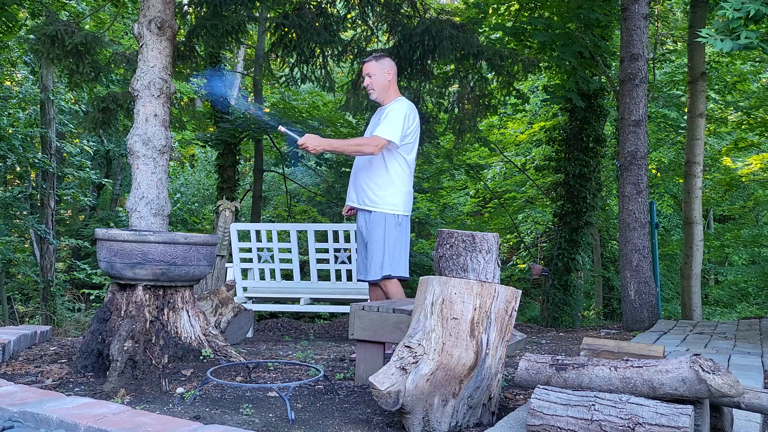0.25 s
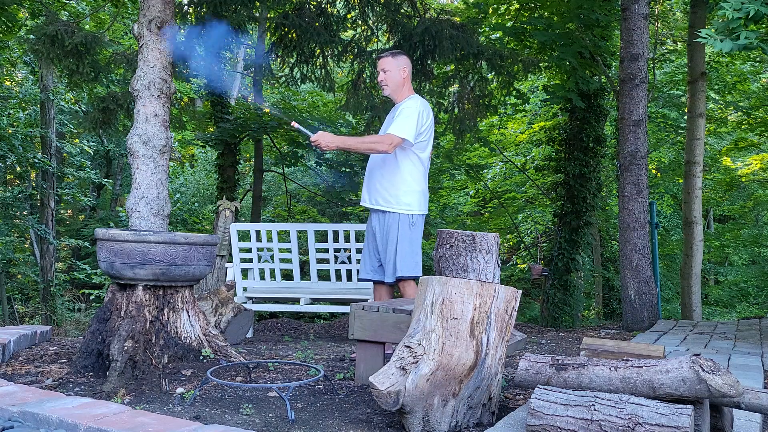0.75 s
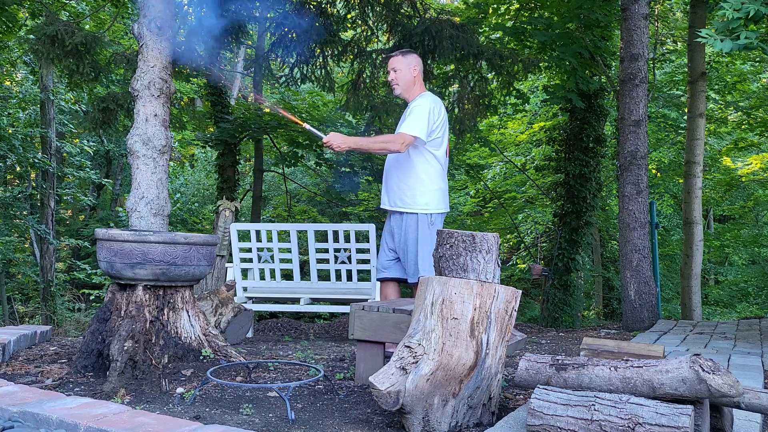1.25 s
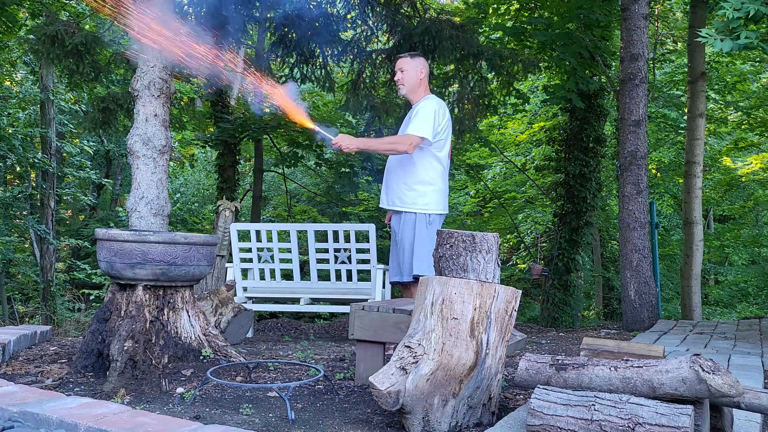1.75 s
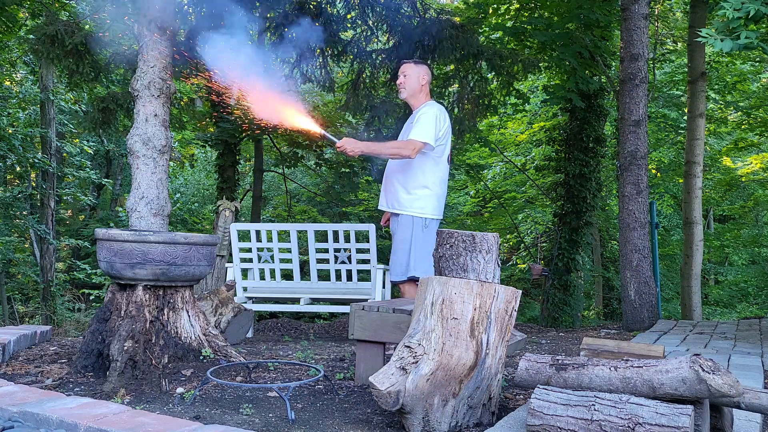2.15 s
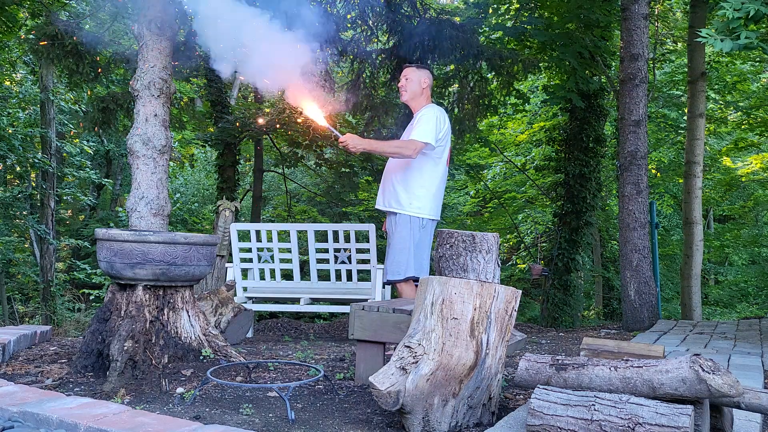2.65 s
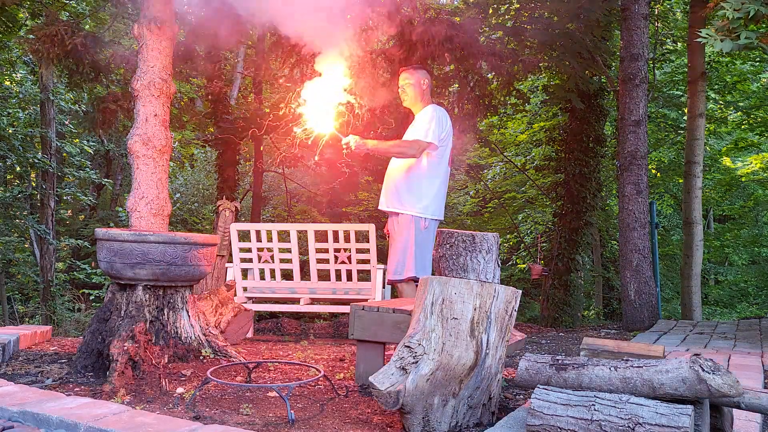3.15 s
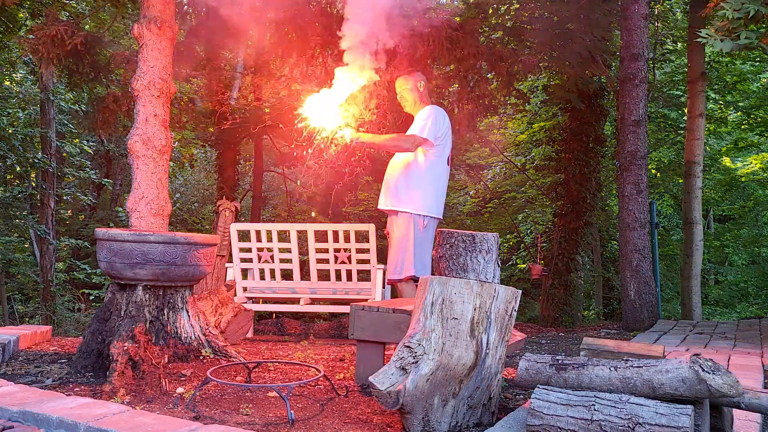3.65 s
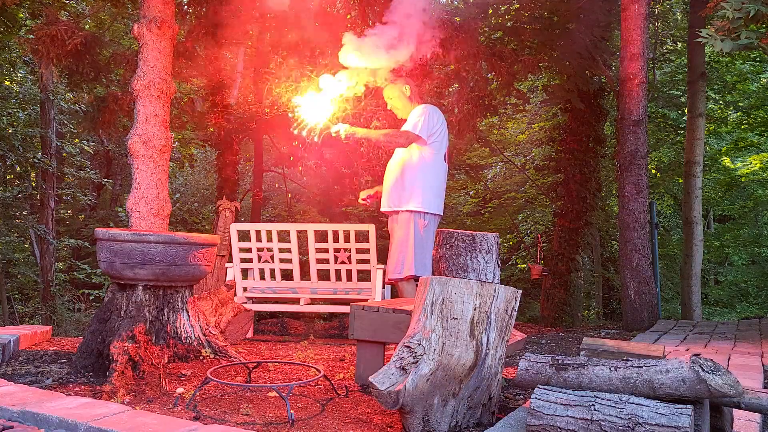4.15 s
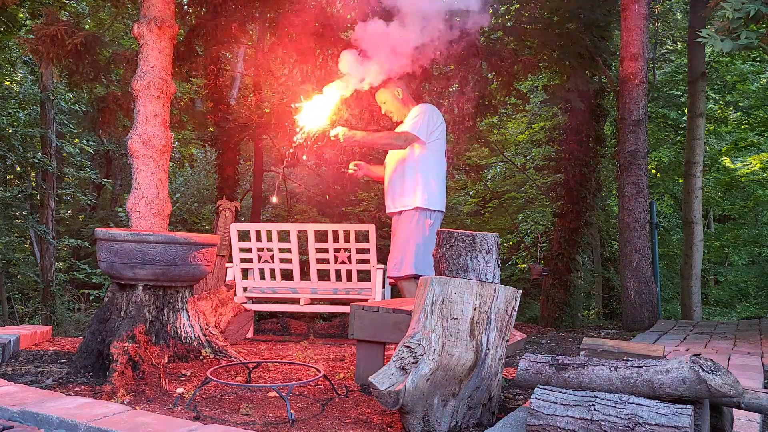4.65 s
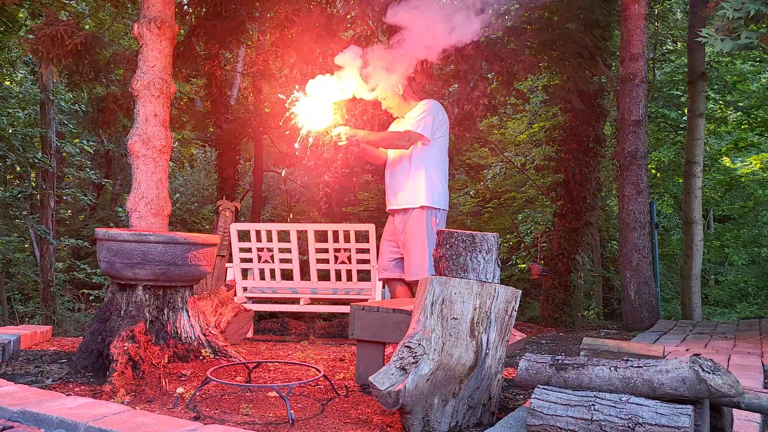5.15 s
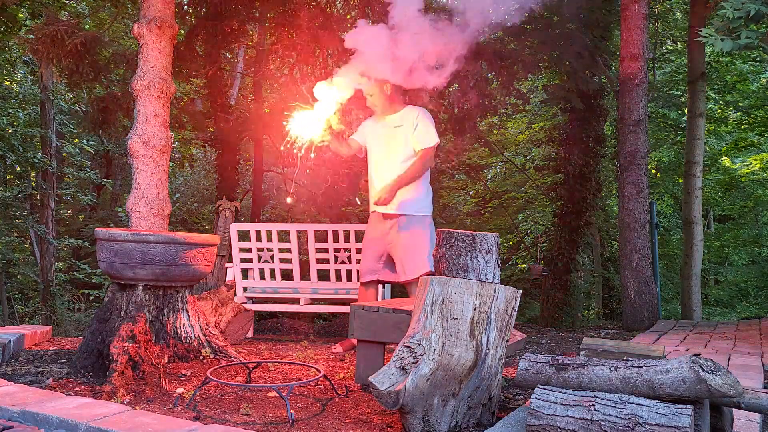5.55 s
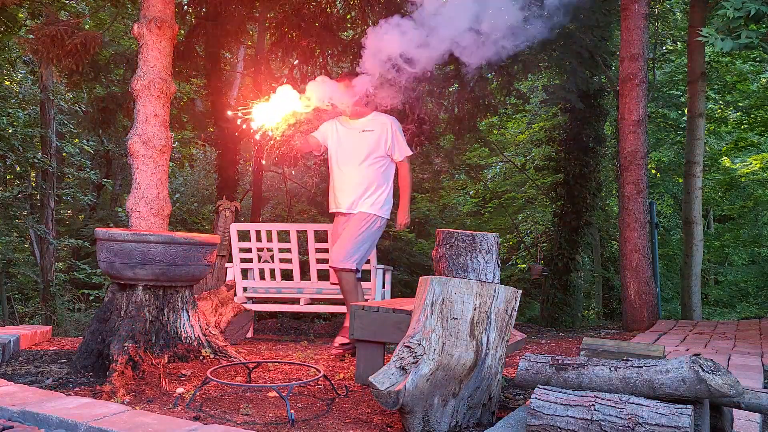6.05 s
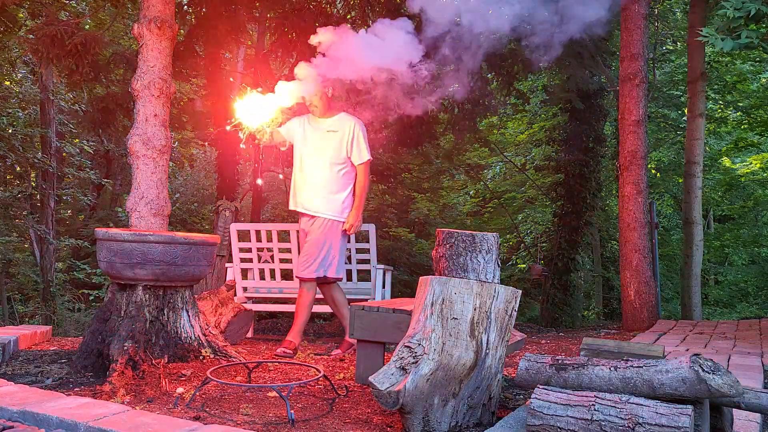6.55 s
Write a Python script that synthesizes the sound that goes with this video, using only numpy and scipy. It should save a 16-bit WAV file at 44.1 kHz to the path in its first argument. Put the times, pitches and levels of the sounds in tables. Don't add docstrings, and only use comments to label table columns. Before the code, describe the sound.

In a wooded yard, a handheld flare a few metres from a stereo microphone starts as a faint fizz, swells into a bright jet with ragged chuffing bursts, then blows out with a sharp pop echoed by trees. Faint embers smoulder for under a second before the main charge takes, growing into a loud, steady, crackly hiss.

```python
import sys
import numpy as np
from scipy import signal
from scipy.fft import rfft, irfft, next_fast_len
from scipy.io import wavfile
from scipy.ndimage import uniform_filter1d, map_coordinates

SR = 44100
rng = np.random.default_rng(int(sys.argv[2]) if len(sys.argv) > 2 else 0)


def unload_wav(signal):
    wavfile.write(
        sys.argv[1],
        SR,
        np.round(np.clip(np.atleast_2d(signal).T, -1, 1) * 32767).astype(np.int16),
    )


def undo_db(level):
    steps = np.asarray(level, float) / 20
    return 10 ** steps


N = 299880


def unit(x):
    return x / np.sqrt(np.mean(x ** 2) + 1e-20)


def along(points, hz):
    f, v = np.transpose(points)
    return np.interp(np.log(hz + 1), np.log(f + 1), v)


def curves(rows):
    s, *columns = np.transpose(rows)
    t = np.arange(N) / SR
    return np.array([np.interp(t, s, column) for column in columns])


def wobble(rate):
    coarse = np.arange(0, N + 32, 32)
    knots = rng.standard_normal(int(N * rate / SR) + 4)
    return np.interp(np.arange(N), coarse, map_coordinates(knots, [coarse * rate / SR]))


def filtered(x, response):
    m = next_fast_len(N + SR // 2)
    return irfft(rfft(x, m) * response(np.fft.rfftfreq(m, 1 / SR)), m)[..., :N]


def add_at(out, s, sound):
    out[:, round(s * SR):][:, :sound.shape[1]] += sound


def noise(colour, patchy_db):
    z = signal.stft(rng.standard_normal(N), nperseg=512)[2]
    field = uniform_filter1d(rng.standard_normal(z.shape), 8, 0)
    field = uniform_filter1d(field, 10, 1)
    patchy = signal.istft(z * undo_db(patchy_db * unit(field)), nperseg=512)[1][:N]
    return unit(filtered(patchy, lambda hz: undo_db(along(colour, hz))))


# (frequency [Hz], level [dB per Hz])
YARD_COLOUR = [(18, -37), (30, -11), (173, -19), (481, -4), (625, -7), (1200, -11), (1520, -24),
               (1880, -30), (2440, -33), (4120, 4.5), (5350, -11), (7720, -28), (8570, -28), (15600, -6.5)]


def yard():
    hum_colour = [(130, -40), (165, 9), (182, -1), (240, -35), (330, -33), (348, 7.0), (370, -21.5)]
    hum = noise(hum_colour, patchy_db=1.0)
    air = np.array([noise(YARD_COLOUR, patchy_db=3.0), noise(YARD_COLOUR, patchy_db=1.0)])
    return undo_db(-51.5) * air + undo_db(-57.5) * hum


# (frequency [Hz], 60 dB decay time [s])
TREE_DECAY = [(60, 0.043), (300, 0.32), (1200, 0.37), (3000, 0.67), (6000, 0.5), (12000, 0.28)]
# (frequency [Hz], level [dB])
TREE_SCATTER = [(60, -16), (300, -4.5), (1500, -3.5), (5000, 1), (12000, -0.5)]


def trees(x):
    hz, t, z = signal.stft(rng.standard_normal((2, 2, SR * 3 // 5)), SR, nperseg=256)
    fall = undo_db(-60 * t / along(TREE_DECAY, hz)[:, None])
    fall *= undo_db(along(TREE_SCATTER, hz))[:, None] / np.linalg.norm(fall, axis=1, keepdims=True)
    stirred = (hz > 7400)[:, None]
    far = np.pad(x, (260, 0))[:N]

    tails = signal.istft(z * fall * ~stirred, SR, nperseg=256)[1] / np.sqrt(128)
    turn = 1.6 * np.arange(N) / SR
    sent = (far * [np.cos(turn), np.sin(turn)])[:, None]
    trunks = signal.fftconvolve(sent, tails, axes=2).sum(0)[:, :N]

    power = np.abs(signal.stft(far, nperseg=256)[2]) ** 2
    power = np.abs(signal.fftconvolve(power, fall ** 2 * stirred, axes=1))[:, :power.shape[1]]
    fresh = signal.stft(rng.standard_normal((2, N)), nperseg=256)[2]
    fresh = fresh / np.sqrt(np.mean(np.abs(fresh) ** 2))
    leaves = signal.istft(np.sqrt(power) * fresh, nperseg=256)[1][:, :N]
    return trunks + leaves


# (time [s], right port lag [samples])
PORT_LAG = [
    (0, 4.25),
    (5.2, 3.31),
    (6.8, 4.8),
]
# (frequency [Hz], level [dB])
BOUNCE_COLOUR = [(200, -8.5), (2000, -6), (4000, -4), (7000, -4), (8500, -7), (15000, -9)]
# (time [s], left delay [ms], right delay [ms])
BOUNCE_DELAY = [(0.2, 1.03, 0.99), (0.7, 1.06, 1.02), (1.6, 1.07, 1.04), (2.3, 1.04, 1.0),
                (3.4, 1.06, 1.04), (4.4, 1.09, 1.08), (5.6, 1.07, 1.045), (6.5, 1.09, 1.07)]


def ports(x):
    def delayed(v, samples):
        return map_coordinates(v, [np.arange(N) - samples], order=3, mode="nearest")

    lag = curves(PORT_LAG) * [[0], [1]]
    bounced = filtered(x, lambda hz: undo_db(along(BOUNCE_COLOUR, hz)))
    return delayed(x, lag) + delayed(bounced, lag + curves(BOUNCE_DELAY) * SR / 1000)


# (time [s], peak level [dB], left-right difference [dB])
POPS = [
    (1.7935, -6, 2),
    (1.7995, -9, 5),
    (1.8403, -8, 4),
]
# (frequency [Hz], level [dB])
BLOW_OUT_COLOUR = [(150, -4), (500, 0), (1200, 1), (2500, 1), (5000, -4.5), (9000, -41), (15000, -22)]


def pop():
    out, t = np.zeros((2, N)), np.arange(SR // 5) / SR
    wave = np.sin(2 * np.pi * 1700 * t + 0.5) * np.exp(-t / 0.00045)
    for s, db, pan_db in POPS:
        gain = undo_db(db + np.array([[0.5], [-0.5]]) * pan_db)
        add_at(out, s, gain * [[1], [-1]] * wave)
    out[:, 47:] += undo_db(-4) * out[:, :-47].copy()

    rush = np.array([noise(BLOW_OUT_COLOUR, patchy_db=2.5), noise(BLOW_OUT_COLOUR, patchy_db=5.5)])[:, :len(t)]
    rush *= undo_db(-14) * (1 - np.exp(-t / 0.003)) * np.exp(-t / 0.033)
    swing = 2 * np.pi * 60 * (t - 0.0036)
    rush[1] += undo_db(-11) * (np.cos(swing) + 0.4 * np.cos(2 * swing)) * np.exp(-(t / 0.027) ** 4)
    rush[1] -= undo_db(-9) * np.exp(-t / 0.0009)
    add_at(out, POPS[0][0], rush)
    return out


# (time [s], peak level [dB], thud level [dB], fizz level [dB])
CHUFFS = [(0.14, -37.5, -3, 5), (0.411, -30, -20, 9), (0.487, -35.5, -6, 5), (0.527, -34, -10, 11.5),
          (0.628, -33, -5, 11.5), (0.677, -34, -6, 2), (0.69, -34, -15.5, 3), (0.774, -27, -2, 7),
          (0.886, -20.5, -14, 5), (0.941, -14, -7.5, -7), (0.974, -18.5, -3, -12), (1.063, -17, -9.5, -2),
          (1.09, -21.5, -11, -7), (1.131, -20, -9.5, -2), (1.155, -12.5, -25, -6), (1.207, -23, -24, 4),
          (1.261, -15.5, -4, -2), (1.299, -28, -21, 1), (1.349, -16, -13, 5), (1.427, -19, -14, 1),
          (1.434, -25.5, -24, 7), (1.54, -12, -10.5, 4.5), (1.602, -12, -16, -7), (1.717, -11, -12, 4),
          (1.731, -20, -22, 5)]
# burst, thud, fizz [s]
CHUFF_LENGTH = [0.018, 0.017, 0.04]
# (frequency [Hz], level [dB])
BURST_COLOUR = [(200, -1), (400, 5.5), (900, 3.5), (2000, 1.5), (4000, -5), (8000, -19), (15000, -3)]
THUD_COLOUR = [(30, -23.5), (70, -19.5), (165, 5), (250, -17), (350, 0.5), (480, -22)]
FIZZ_COLOUR = [(2500, -13), (4000, 6), (7000, 6), (8300, 0.5), (13000, -7.5), (15700, -1.5)]


def chuffs():
    t = np.arange(SR // 6) / SR
    levels = np.zeros((3, N))
    rise = 1 - np.exp(-t / 0.00095)
    shape = rise * np.exp(-(t / np.array(CHUFF_LENGTH)[:, None]) ** 1.53)
    for s, db, thud_db, fizz_db in CHUFFS:
        parts_db = np.array([[-7], [thud_db - 1.0], [fizz_db - 13.5]])
        add_at(levels, s, undo_db(db + parts_db) * shape)
    ragged = unit(undo_db(4.1 * wobble(250)))
    burst = ragged * noise(BURST_COLOUR, patchy_db=0.5)
    thud = noise(THUD_COLOUR, patchy_db=1.0)
    fizz = noise(FIZZ_COLOUR, patchy_db=-3.5)
    return np.sum(levels * [burst, thud, fizz], axis=0)


def flame(burn, bands):
    full_db, grows = np.transpose(bands)[..., None]
    full_burn_db = -31
    return full_db + grows * (curves(burn) - full_burn_db)


BAND_EDGES = (300, 2700, 8200)


def jet(bands_db, colour, flicker_db, flutter_db, spit_db):
    grains = undo_db(5.9 * np.minimum(rng.exponential(1, N), 1.8))
    grains = grains * (rng.random(N) < 700 / SR) * rng.standard_normal(N)
    spit = unit(filtered(grains, lambda hz: undo_db(along(colour, hz))))
    gas = noise(colour, patchy_db=1.03) + undo_db(spit_db) * spit

    def splits(hz):
        below = [1 / (1 + (hz / edge) ** 8) for edge in BAND_EDGES]
        return np.diff([0 * hz, *below, 1 + 0 * hz], axis=0)

    bands = filtered(gas, splits)
    flicker = flicker_db * wobble(12)
    flutter = flutter_db * (wobble(35) + 1.1 * wobble(90))
    flame_db = flicker + flutter * [[0.6], [0.8], [1.1], [1.5]]
    return sum(undo_db(db + 0.5 * wobble(14)) * unit(band) for db, band in zip(bands_db + flame_db, bands))


# (time [s], burn strength [dB])
STARTER_BURN = [
    (0, -53),
    (0.3, -52),
    (0.45, -42),
    (0.615, -46),
    (0.64, -41),
    (0.95, -32.5),
    (1.035, -34.5),
    (1.14, -30.5),
    (1.78, -28.5),
]
# (level at full burn [dB], growth [dB per dB of burn])
STARTER_BANDS = [(-46, -0.1), (-50, 0.5), (-34.5, 1.07), (-29.5, 0.95)]
# (frequency [Hz], level [dB per Hz])
STARTER_COLOUR = [(18, -44), (30, -10.5), (160, 0), (225, -10), (351, -1.5), (548, 15.5), (625, 6.5),
                  (1520, 4), (1880, 3.5), (2380, -10), (2780, -15), (5210, -24), (7140, -9.5), (8800, -19),
                  (15600, -13.5)]


def starter():
    t = np.arange(N) / SR
    alight = undo_db(-np.clip(t - 1.825, 0, 1) * 1400)
    bands_db = flame(STARTER_BURN, STARTER_BANDS)
    return alight * jet(bands_db, STARTER_COLOUR, flicker_db=0.78, flutter_db=2.22, spit_db=-4.0)


# (time [s], burn strength [dB])
MAIN_BURN = [(2.42, -65), (2.7, -55.5), (2.98, -45.5), (3.17, -35), (3.3, -34.5), (3.44, -35),
             (3.76, -32.5), (3.86, -30.5), (4.5, -31), (4.66, -33.5), (4.9, -31.5), (5.12, -31.5),
             (5.3, -30), (5.52, -32.5), (5.68, -30.5), (6.3, -31.5), (6.5, -30), (6.8, -31.5)]
# (level at full burn [dB], growth [dB per dB of burn])
MAIN_BANDS = [(-46.5, 0.97), (-43.5, 1.52), (-35, 1.04), (-33, 2.17)]
# (frequency [Hz], level [dB per Hz])
MAIN_COLOUR = [(18, -42), (30, -18), (59, -1), (123, 1.5), (469, -12.5), (521, -11), (1140, -11),
               (1410, -10.5), (1830, -7.5), (2380, -9.5), (3910, -0.5), (7320, 0), (8130, -7), (13400, -7),
               (15600, -7)]
# rumble, body, hiss, sizzle level [dB]
EMBERS = [-61.5, -52.5, -70, -67]


def main_charge():
    t = np.arange(N) / SR
    lit = np.clip((t - 1.8) / 0.059, 0, 1)
    sag_db_per_s, embers_out_s, fade_db_per_s = 5, 2.635, 83
    cooled_db = sag_db_per_s * (t - 2) + fade_db_per_s * np.clip(t - embers_out_s, 0, None)
    gains = undo_db(flame(MAIN_BURN, MAIN_BANDS)) + undo_db(np.array(EMBERS)[:, None] - cooled_db)
    early_sizzle_s, early_sizzle_rise_s = 2.43, 0.22
    gains[3] += undo_db(-57.5) * np.clip((t - early_sizzle_s) / early_sizzle_rise_s, 0, 1)
    bands_db = 20 * np.log10(gains)
    return lit * jet(bands_db, MAIN_COLOUR, flicker_db=-0.58, flutter_db=0.67, spit_db=-8.5)


# (frequency [Hz], left-right difference [dB])
PORT_LEAN = [(60, 7), (95, -3.5), (150, 2), (240, 0.5), (380, 0.5), (600, -1.5), (950, 2.5), (1500, 0),
             (2380, 2.5), (3770, -0.5), (5980, 3), (9470, 3), (15000, 6)]


def scene():
    flare, blast = starter() + main_charge() + chuffs(), pop()
    heard = ports(flare) + trees(flare + 0.53 * blast[0]) + yard()
    leaned = filtered(heard, lambda hz: undo_db(along(PORT_LEAN, hz) * [[0.5], [-0.5]]))
    return leaned + blast


def band_limit(x):
    return signal.sosfilt(signal.butter(12, 16900, fs=SR, output="sos"), x)


def record(dry):
    mix = filtered(dry, lambda hz: hz < 15750)
    return band_limit(mix)


dry = scene()
out = record(dry)
unload_wav(out)
```